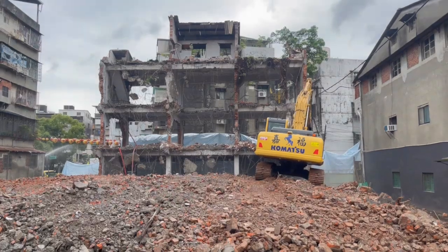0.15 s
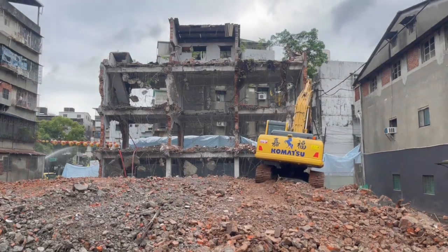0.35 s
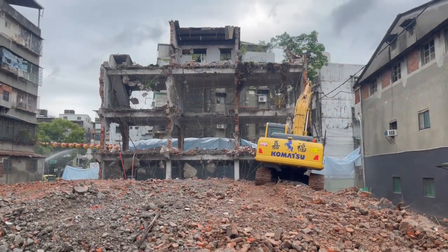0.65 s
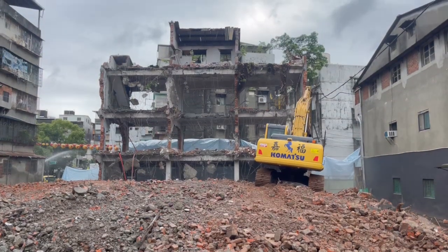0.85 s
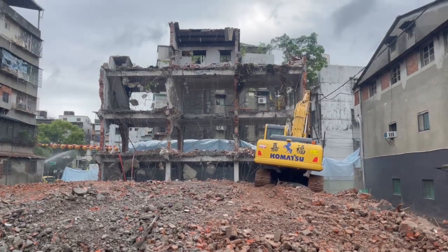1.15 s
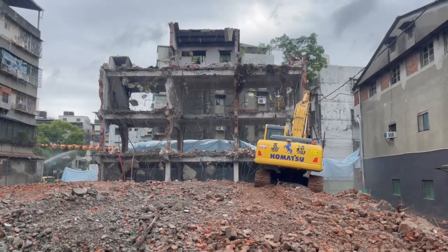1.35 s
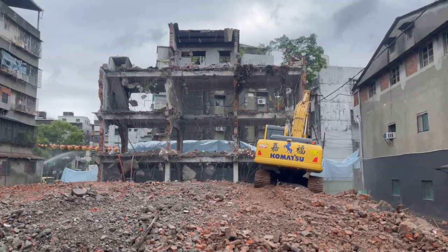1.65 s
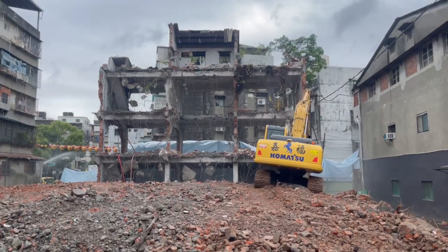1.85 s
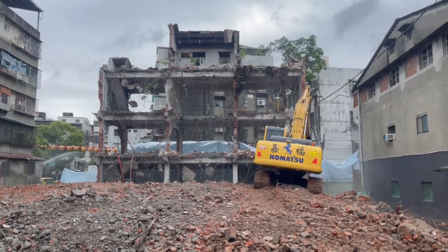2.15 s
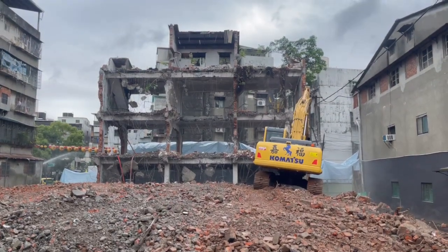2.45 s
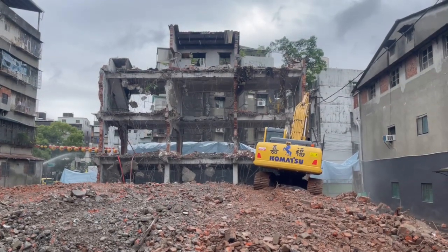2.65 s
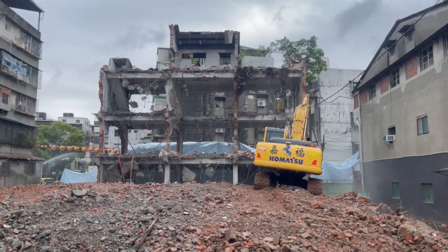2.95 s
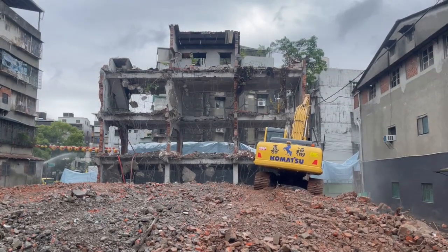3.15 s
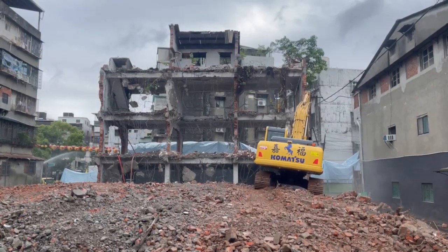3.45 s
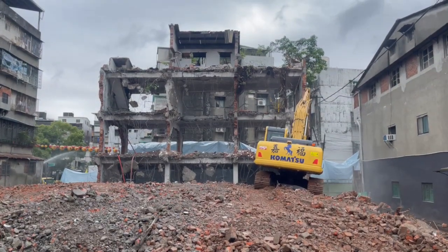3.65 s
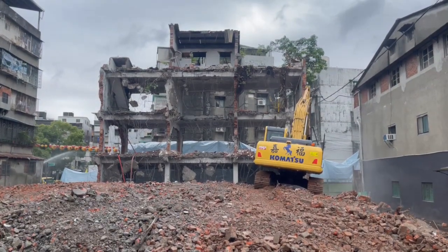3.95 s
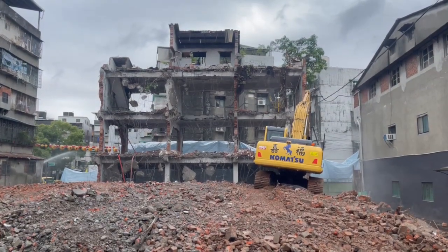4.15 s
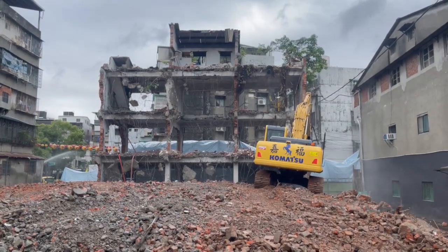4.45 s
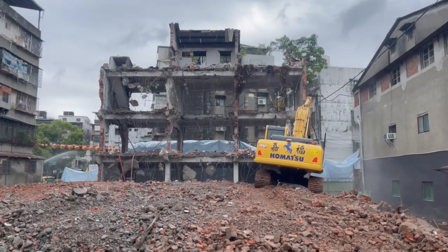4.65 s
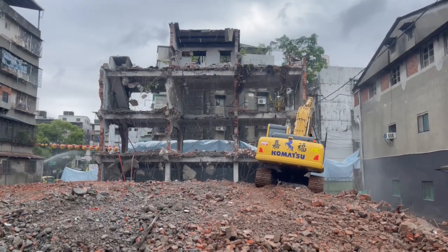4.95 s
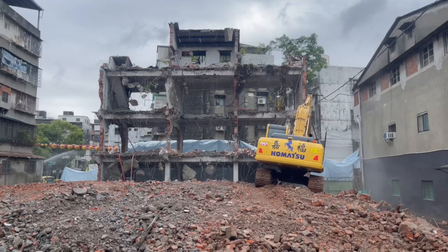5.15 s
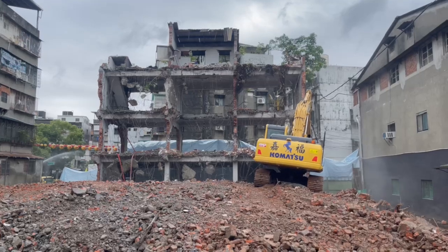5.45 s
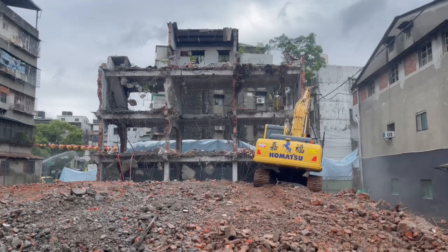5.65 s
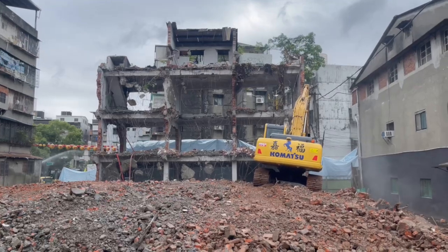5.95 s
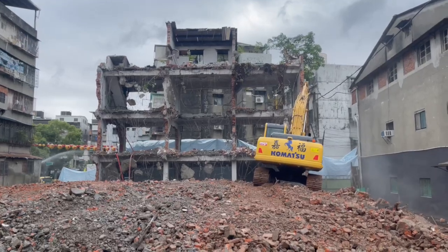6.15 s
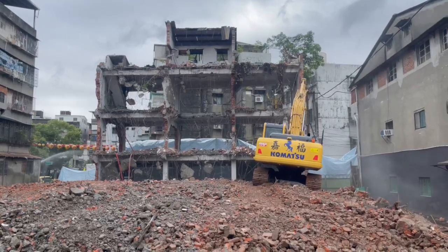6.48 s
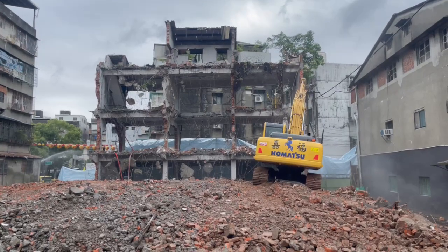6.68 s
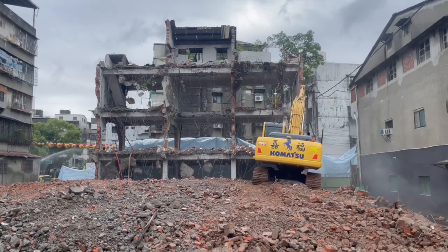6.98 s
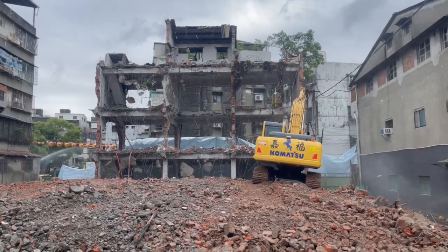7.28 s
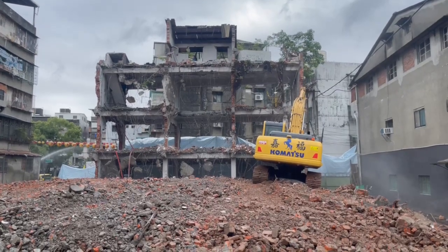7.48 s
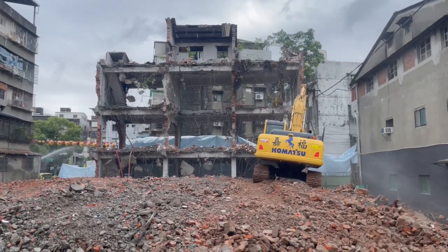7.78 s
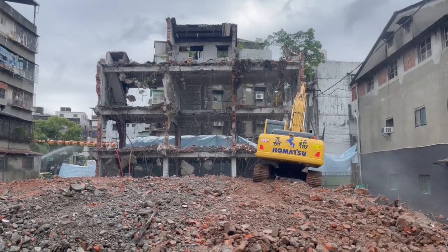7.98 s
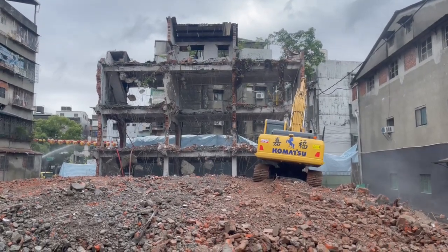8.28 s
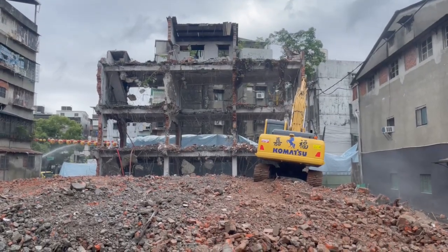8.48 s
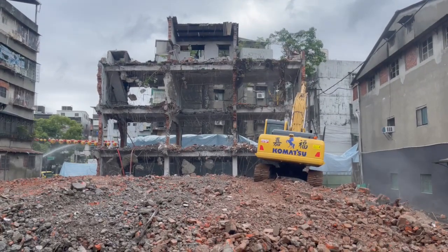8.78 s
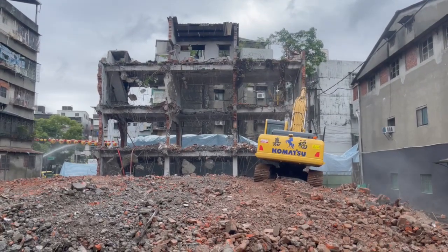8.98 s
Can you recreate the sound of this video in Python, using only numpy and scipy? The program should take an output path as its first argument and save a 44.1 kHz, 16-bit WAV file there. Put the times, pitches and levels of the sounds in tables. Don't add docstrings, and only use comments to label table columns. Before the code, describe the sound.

Throughout about nine seconds a diesel excavator drones low, around 95 to 100 hertz, sagging and strengthening with each pull and briefly running freer between them. A thin turbo whistle near 10 to 11 kilohertz rises and falls over fan roar, pump whine and hiss. Small rubble stirs at the start; tiny clinks at 0.6 lead to a sharp, bright cluster of crashes at 1.0, with hollow steel knocks and ground rumble. Lesser breakage follows at 1.8, then a deep fall at 2.8 with sliding debris. A clink at 3.3 precedes a slab crash at 4.3 and tumbling lumps until about 5.3. The engine then labours mostly alone until 7.1, when the heaviest fall booms with a steel clang. Bricks trickle, a dull knock comes at 8.0, and a last crash with rubble at 8.9. House walls return a diffuse echo; the phone is distant.

```python
import sys
import numpy as np
from scipy import signal
from scipy.fft import rfft, irfft, next_fast_len
from scipy.io import wavfile

SR = 44100
rng = np.random.default_rng(int(sys.argv[2]) if len(sys.argv) > 2 else 0)


def bounce(signal):
    frames = np.transpose(np.atleast_2d(signal))
    limited = np.clip(frames, -1, 1)
    pcm = np.round(limited * 32767).astype(np.int16)
    wavfile.write(sys.argv[1], SR, pcm)


def invert_db(x):
    u = np.asarray(x, float) / 20
    return 10 ** u


N = 402191
STEP = 32
COARSE = np.arange(N // STEP + 1) * STEP / SR


def rms_one(x):
    return x / np.sqrt(np.mean(x ** 2) + 1e-20)


def at_hz(points, hz, column=1):
    points = np.array(points)
    return np.interp(np.log(hz), np.log(points[:, 0]), points[:, column])


def stretch(coarse):
    return np.interp(np.arange(N) / STEP, np.arange(len(coarse)), coarse)


def drift(rate_hz):
    r = np.exp(-2 * np.pi * STEP * rate_hz / SR)
    noise = rng.standard_normal(len(COARSE) + 2000)
    return rms_one(signal.lfilter([1], [1, -2 * r, r * r], noise)[2000:])


def ring(clicks, hz, t60):
    r = invert_db(-60 / (t60 * SR))
    w = 2 * np.pi * hz / SR
    return signal.lfilter([0, np.sin(w)], [1, -2 * r * np.cos(w), r * r], clicks + 1e-18)


def lag(aim, up_s, down_s):
    out, up, down = [aim[0]], STEP / SR / up_s, STEP / SR / down_s
    for goal in aim[1:].tolist():
        out.append(out[-1] + (goal - out[-1]) * (up if goal > out[-1] else down))
    return np.array(out)


# start t/s, end t/s, firing f/Hz, firing tone level/dB, turbo aim f/Hz
LOAD_PULLS = [(0, 0.313, 93.3, -20, 11390), (0.743, 1.412, 94.9, -28.5, 9850),
              (1.518, 1.71, 96.4, -25, 10700), (1.721, 2.364, 95.7, -21.5, 11100),
              (2.7, 3.023, 94.18, -27.5, 10300), (3.172, 3.4, 98.8, -28, 10700),
              (3.4, 3.949, 97.6, -23, 11200), (4.368, 4.75, 92.2, -26, 10550),
              (4.75, 5.47, 93.8, -21.5, 10830), (5.471, 5.669, 94, -25.5, 10840),
              (5.655, 6.361, 94.4, -21, 11340), (6.722, 7.499, 96, -27, 10440),
              (7.552, 8.451, 94.9, -20.5, 11310), (8.767, 9.198, 92.2, -24.5, 10300)]


def governor():
    free_hz, free_db, free_turbo_hz = 103.2, -29.5, 9550
    sag_s, recover_s, fuel_s = .13, .07, .04
    manifold_s, spool_up_s, spool_down_s = .1, .28, .24
    aims = np.outer([free_hz, free_db, free_turbo_hz], np.ones(len(COARSE)))
    for start, end, *aim in LOAD_PULLS:
        aims[:, (COARSE >= start) & (COARSE < end)] = np.array(aim)[:, None]
    aims[:, 0] += [3.5, 0, -170]
    firing_hz = lag(aims[0], recover_s, sag_s)
    tone_db = lag(aims[1], fuel_s, fuel_s)
    gas_hz = lag(aims[2], manifold_s, manifold_s)
    return firing_hz, tone_db, lag(gas_hz, spool_up_s, spool_down_s)


# multiple of firing rate [1], level/dB re second order
SHAFT_ORDERS = [
    (.5, -29),
    (1.5, -27),
    (2.83, -2.5),
    (3, -5),
    (4, -8),
]


def exhaust():
    second_db, second_follows = -38, 0.21
    crank_db = -48.5
    firing_hz, tone_db, _ = governor()
    second_db = second_db + second_follows * (tone_db - tone_db.mean()) + 1.08 * drift(2.03)
    phase = 2 * np.pi * np.cumsum(firing_hz + 0.598 * drift(5.74)) * STEP / SR
    out = invert_db(tone_db + 2.2 * drift(4.5)) * np.sin(phase + 0.057 * drift(27.0))
    out += invert_db(crank_db + 1.5 * drift(2.5)) * np.sin(phase / 3)
    for multiple, level_db in [(2, 1.5)] + list(SHAFT_ORDERS):
        gain = invert_db(second_db + level_db + 2.0 * drift(8.7))
        out += gain * np.sin(multiple * phase + 0.26 * drift(5.7))
    return np.sqrt(2) * signal.resample_poly(out, STEP, 1)[:N]


def turbo():
    hz = governor()[2]
    level_db = -41 + 13 * (hz / 1000 - 11)
    gain = stretch(invert_db(level_db + 3.3 * drift(20.0)))
    return gain * np.sin(2 * np.pi * np.cumsum(stretch(hz + 50 * drift(30.2))) / SR)


# t/s, peak level/dB, treble lift level/dB, t60 t/s, rise t/s
IMPACTS = [(.826, -12, -4, 0.73, 0.0026), (.962, -4.5, -5, 0.75, 0.014), (.987, -4, -2.5, 0.31, 0.0025),
           (1.025, 1, 6, 0.46, 0.00097), (1.16, -9.5, -6, 0.21, 0.0045), (1.71, -6.5, 3.5, 1.42, .014),
           (1.795, -2.5, -0.5, 0.82, 0.023), (2.353, -12.5, -10, .4, 0.0053), (2.793, 2, 4, 0.94, 0.012),
           (2.818, -5.5, 8.5, 0.87, 0.0012), (2.993, -17, 8, 0.36, .008), (3.329, -13, 10, 0.28, 0.0019),
           (3.97, -15, -13, 0.49, .006), (4.294, 4, 0, 0.9, 0.01), (4.359, -6.5, 4, 1.05, 0.0053),
           (4.619, -15, 12.5, 0.13, 0.003), (4.863, -9.5, 1, 0.56, 0.0047), (6.909, -16, -6, 0.64, 0.0047),
           (7.106, -1, 3.5, 0.97, .04), (7.156, 0.5, 2.5, 1.24, .0037), (8.009, -11, -11.5, 0.56, 0.007),
           (8.673, -12, -10, 0.4, 0.0086), (8.926, -2, -1, 1.2, 0.023), (8.969, -2.5, 4.5, 1.2, .008)]
# f/Hz, level/dB, t60 t/s
STEEL_MODES = [(357, -15, 0.97), (355.7, -5, 2.1), (402, -8, .1), (455, -0.5, .15), (632, 1.5, 0.15),
               (751, -1.5, 0.099), (803, 4.5, 0.13), (1270, -5.5, 0.29), (1716, -8.5, .15), (2150, -8, .1)]


def steel():
    ring_db, ring_per_lift = -29.5, -0.26
    chatter_s, spread_db = .03, 2.5
    s, peak_db, lift_db, _, _ = np.transpose(IMPACTS)[:, :, None]
    touches = ((s + chatter_s * rng.random((len(s), 4))) * SR).astype(int)
    out = 0
    for hz, level_db, t60 in STEEL_MODES:
        chance_db = rng.normal(0, spread_db, touches.shape)
        clicks = np.zeros(N)
        clicks[touches] = invert_db(peak_db + ring_db + ring_per_lift * lift_db + level_db + chance_db)
        out = out + ring(clicks, hz, t60)
    return out


# t/s, f/Hz, level/dB, t60 t/s
STRUCK_PIECES = [(.635, 5000, -39, .15), (.7, 5000, -40, 0.17), (.77, 5000, -41, .12), (.83, 770, -21, .06),
                 (.988, 732, -10, 0.061), (4.31, 755, -11, 0.11), (4.866, 379, -17.5, .12),
                 (1.028, 2075, -16, 0.084), (3.295, 5000, -34, 0.11), (3.329, 5463, -27, .05),
                 (3.341, 1874, -25, 0.078), (6.43, 10540, -40, 0.32), (6.445, 9550, -50, 0.31),
                 (7.157, 1705, -12, 0.052), (7.159, 377.5, -5, 0.12), (1.031, 342, -14, 0.11),
                 (2.803, 350, -10, 0.097), (8.87, 5410, -33, .05), (8.872, 8250, -39, 0.052),
                 (8.99, 2100, -16, .08)]


def clinks():
    out = 0
    for s, hz, level_db, t60 in STRUCK_PIECES:
        click = invert_db(level_db) * (np.arange(N) == int(s * SR))
        out = out + ring(click, hz, t60)
    return out


# t/s, hold t/s, lumps level/dB, grit level/dB
RUBBLE_SLIDES = [(0.027, 0.17, -20, -37), (0.985, 0.15, -17, -20.5), (1.253, 0.3, -19.5, -35),
                 (1.76, 0.26, -26, -35), (2.1, .6, -22.5, -54), (2.793, 0.73, -18, -33),
                 (4.279, 0.44, -16, -31), (4.72, 0.31, -13, -32.5), (5.049, 0.23, -19, -45),
                 (7.113, 0.091, -11, -27), (7.449, 0.39, -17, -36.5), (7.95, 0.93, -23, -39.5),
                 (8.92, .3, -6.5, -25)]


def slides():
    rise_s, fade_db_per_s = 0.023, 78
    s, hold_s, lumps_db, grit_db = np.transpose(RUBBLE_SLIDES)[:, :, None]
    times = COARSE[::8]
    age = np.maximum(times - s, 0)
    shape = (1 - np.exp(-age / rise_s)) * invert_db(-fade_db_per_s * np.maximum(age - hold_s, 0))
    totals = [np.sqrt(np.sum((shape * invert_db(db)) ** 2, axis=0)) for db in (lumps_db, grit_db)]
    return [np.interp(COARSE, times, total) for total in totals]


# f/Hz, density level/dB per Hz
CONCRETE_SPECTRUM = [(30, -10), (60, -2.5), (150, -9.5), (240, -12.5), (400, -4), (800, -5), (1300, -13),
                     (2200, -13), (3500, -20), (5500, -23), (7200, -41.5), (8800, -30), (11000, -29),
                     (12500, -40)]


def debris(hz, clumps):
    s, peak_db, lift_db, t60, rise_s = np.transpose(IMPACTS)[:, :, None]
    times = COARSE[::3]
    age = np.maximum(times - s, 0)
    octaves = np.log2(hz / 700)
    rise = 1 - np.exp(-age / (rise_s + (8.4 / hz) ** 2))
    crack_db = 3.5 * np.exp(-age / 0.023)
    decay_db = 60 * age / (t60 * 2 ** (-.12 * octaves))
    bursts = rise * invert_db(peak_db + 3.0 + crack_db + lift_db * octaves / 3 - decay_db)
    burst_power = np.interp(COARSE, times, np.sum(bursts ** 2, axis=0))
    lumps, grit = slides()
    treble = np.clip(octaves / 2, 0, 1)
    trickle = (lumps * invert_db(6.5)) ** (1 - treble) * (grit * invert_db(21)) ** treble
    colour = invert_db(at_hz(CONCRETE_SPECTRUM, hz) + 1.0 * clumps + 2.25 * drift(11.8))
    return colour * np.sqrt(burst_power + trickle ** 2)


def chunks(clumps):
    struck = rng.random(N) < 250 / SR
    strength = invert_db(5.5 * np.minimum(rng.exponential(1, N), 4))
    knocks = struck * strength * rng.choice([-1, 1], N) * stretch(debris(940, clumps))
    dealt = rng.integers(0, 10, N)
    out = 0
    for k, hz in enumerate(np.geomspace(280, 5000, num=10)):
        out = out + invert_db(at_hz(CONCRETE_SPECTRUM, hz) - 19.5) * ring(knocks * (dealt == k), hz, 9.0 / hz)
    return out


# t/s, level/dB, centre f/Hz, t60 t/s
LANDINGS = [
    (1.02, -9, 139, 0.45),
    (1.1, -5, 65.4, 3.6),
    (2.9, 2, 90, .9),
    (4.33, -2, 80, 2.4),
    (4.36, -5, 220, 0.9),
    (7.2, -2, 129.3, 0.71),
    (7.26, 9, 69.8, 0.66),
    (8.95, -9, 150, .9),
]


def thuds(hz):
    s, level_db, centre_hz, t60 = np.transpose(LANDINGS)[:, :, None]
    times = COARSE[::8]
    age = np.maximum(times - s, 0)
    band_db = -32 * np.log2(hz / centre_hz) ** 2
    swell = (1 - np.exp(-age / 0.055)) * invert_db(level_db + 3.5 - 60 * age / t60 + band_db)
    return np.interp(COARSE, times, np.sqrt(np.sum(swell ** 2, axis=0)))


# f/Hz, rms level/dB, t60 t/s
RESONANCES = [
    (610.5, -50, 1),
    (1830, -75, 0.66),
    (2161, -51.5, 0.097),
    (3614, -60, 0.17),
    (5000, -58, .05),
]


def whines():
    noise = rng.standard_normal(N)
    out = 0
    for hz, level_db, t60 in RESONANCES:
        out = out + stretch(invert_db(level_db + 2.5 * drift(2.8))) * rms_one(ring(noise, hz, t60))
    return out


# f/Hz, density level/dB per Hz
ROAR_SPECTRUM = [(30, 9), (60, 5), (150, -2), (240, -8), (400, -5.5), (800, -10), (1300, -14), (2200, -17),
                 (3500, -23), (5500, -25), (7200, -47.5), (8800, -40), (11000, -26), (12500, -44)]


def roar(hz):
    return invert_db(-10 + at_hz(ROAR_SPECTRUM, hz) + 0.96 * drift(25.0))


def bands(sources, edges, rate):
    for k, (low, high) in enumerate(zip(edges, edges[1:])):
        sos = signal.butter(2, [low, high], "band", fs=rate, output="sos")
        yield np.sqrt(low * high), signal.sosfilt(sos, sources[k % 2])


def noise_field(clumps):
    edges = 36 * 2 ** np.arange(0, 9, .5)

    def level(hz):
        return np.sqrt(roar(hz) ** 2 + debris(hz, clumps) ** 2 + thuds(hz) ** 2)

    grains = rms_one(rng.laplace(0, 1, (2, N)) * (rng.random((2, N)) < 9000 / SR))
    streams = grains, grains[:, ::-1].copy()
    highs = sum(stretch(level(hz)) * band for hz, band in bands(streams, edges[7:], SR))
    rumble = rng.standard_normal((2, 2, len(COARSE))) * invert_db(1.5) / np.sqrt(STEP)
    lows = sum(level(hz) * band for hz, band in bands(rumble, edges[:8], SR / STEP))
    lows = signal.sosfilt(signal.butter(4, 61.2, "high", fs=SR / STEP, output="sos"), lows)
    return highs + signal.resample_poly(lows, STEP, 1, axis=1)[:, :N]


def yard(x):
    t60_s, echo_db, first_echo_s = 1, 2.5, .012
    t = np.arange(SR // 2) / SR
    tail = rng.standard_normal((2, len(t))) * invert_db(-60 * t / t60_s) * (t > first_echo_s)
    tail = tail / np.linalg.norm(tail, axis=1)[:, None]
    return x + invert_db(echo_db) * signal.oaconvolve(x[None], tail, axes=1)[:, :N]


def scene():
    clumps = np.tanh(drift(8.1))
    here, other = noise_field(clumps) + yard(steel() + clinks() + chunks(clumps) + whines())
    return np.array([here + exhaust() + turbo(), other])


# f/Hz, coherence 0-1 [1], right over left level/dB, right lead phase/rad
STEREO_PAIR = [(60, .98, 1, 0), (250, .8, .5, 0), (800, .4, -1.5, 0), (1900, .5, 2, 1.3), (2900, .45, 2, 3.3),
               (4100, .25, -2, 6.4), (4900, .35, -7, 9.5), (6400, .3, -10, 11.6), (8300, .55, -2, 12.7),
               (8900, .9, 0, 12.7), (9750, 1, 0, 5 * np.pi), (10500, 1, 0, 5 * np.pi), (11200, .8, -1, 17.4),
               (11750, .97, 0, 6 * np.pi)]


def stereo_curve(column):
    hz = np.maximum(np.fft.rfftfreq(next_fast_len(N), 1 / SR), 1)
    return at_hz(STEREO_PAIR, hz, column)


def unsteady_top(x):
    top_hz, swing_hz, hz_per_db = 11480, 594, 28
    grid_hz, lowest_hz = 344, 11180
    hz, s, frames = signal.stft(x.astype(np.float32), SR, nperseg=2048)
    edge = top_hz + swing_hz * np.tanh(1.5 * np.interp(s, COARSE, drift(9.0)))
    loud_db = 10 * np.log10(np.sum(np.abs(frames[0, 200:400]) ** 2, axis=0) + 1e-12)
    edge = edge + hz_per_db * (loud_db - np.median(loud_db))
    edge = np.maximum(grid_hz * np.round(edge / grid_hz), lowest_hz)
    return signal.istft(frames * (hz[:, None] < edge), SR, nperseg=2048)[1][:, :N]


def roll_off(x):
    return signal.sosfilt(signal.butter(12, 13040, fs=SR, output="sos"), x)


def record(dry):
    alike = np.clip(stereo_curve(column=1), 0, 1)
    here, other = rfft(dry, next_fast_len(N))
    mixed = alike * here + np.sqrt(1 - alike ** 2) * other
    right = mixed * invert_db(stereo_curve(column=2)) * np.exp(1j * stereo_curve(column=3))
    x = np.array([dry[0], irfft(right, next_fast_len(N))[:N]])
    x = 1.234 * np.tanh(x / 1.268)
    x = signal.sosfilt(signal.butter(6, 11800, fs=SR, output="sos"), x)
    return roll_off(unsteady_top(x))


dry = scene()
out = record(dry)
bounce(out)
```